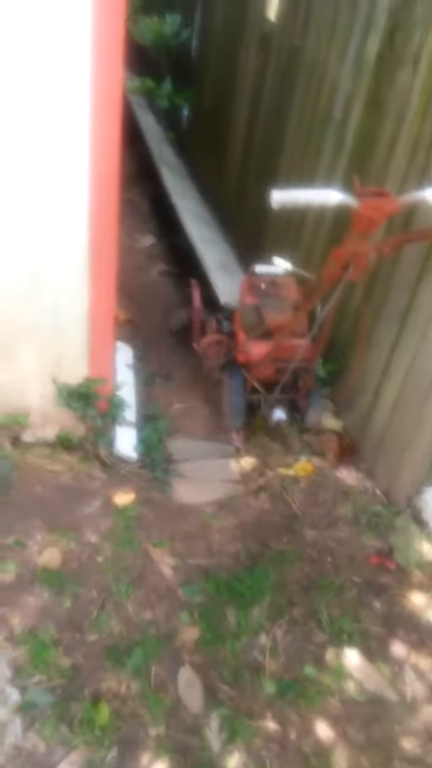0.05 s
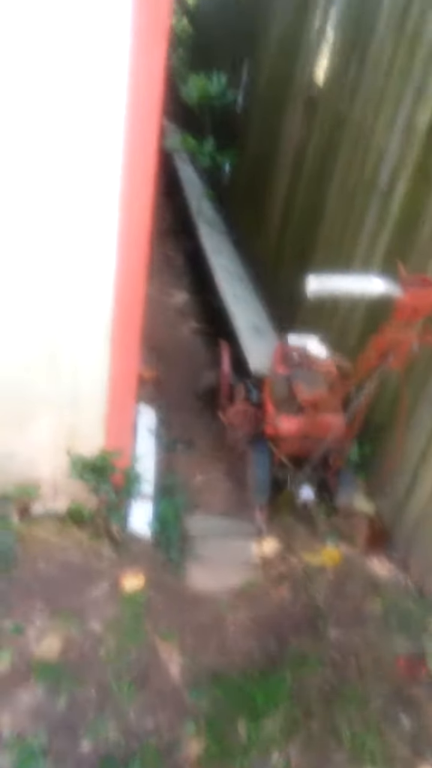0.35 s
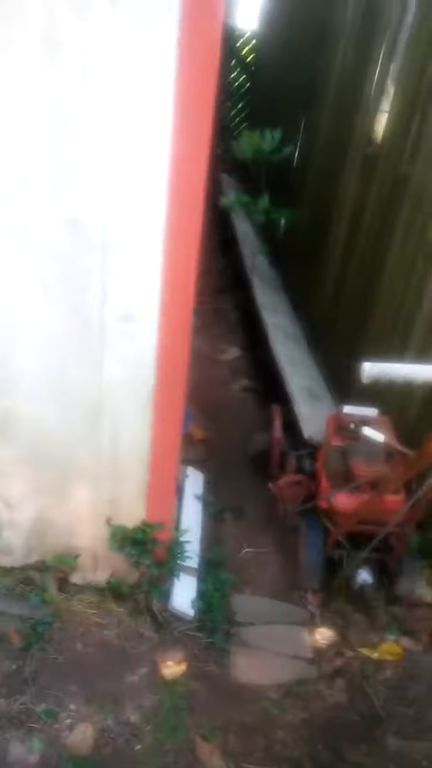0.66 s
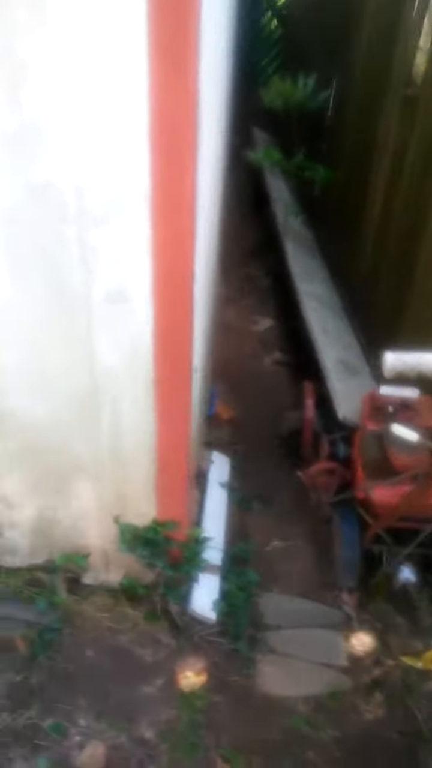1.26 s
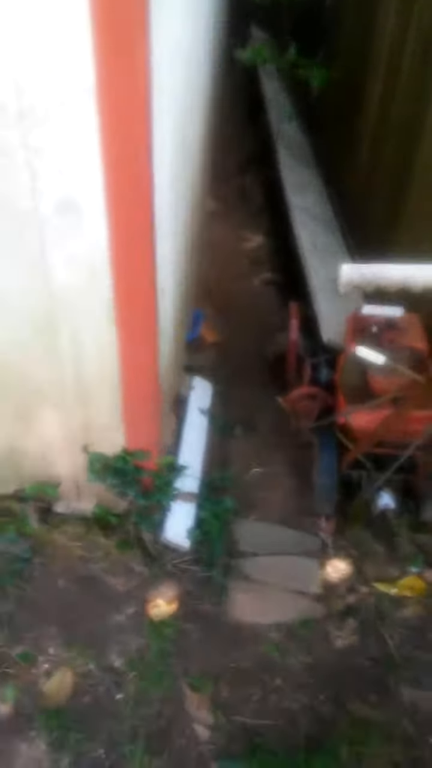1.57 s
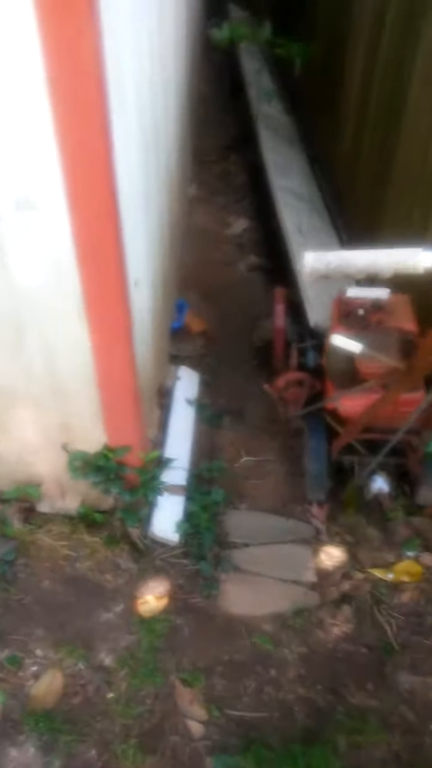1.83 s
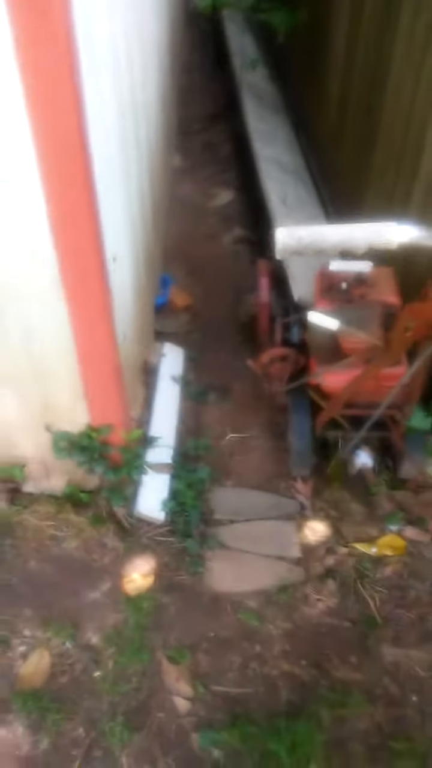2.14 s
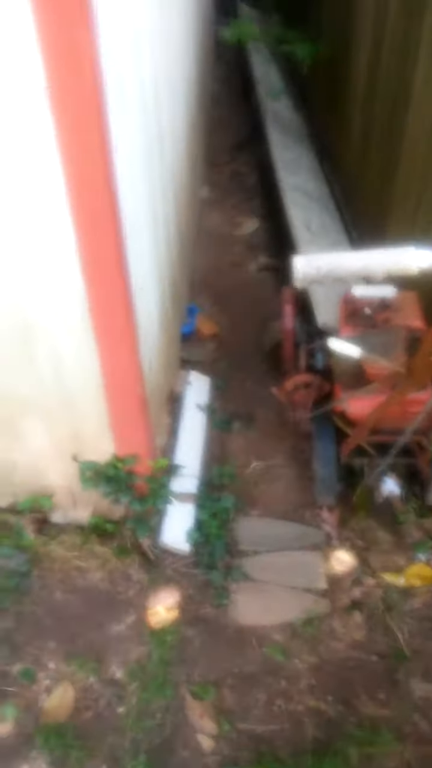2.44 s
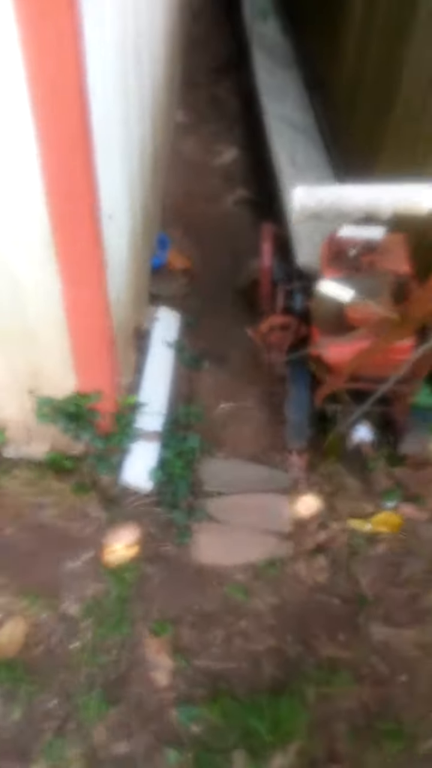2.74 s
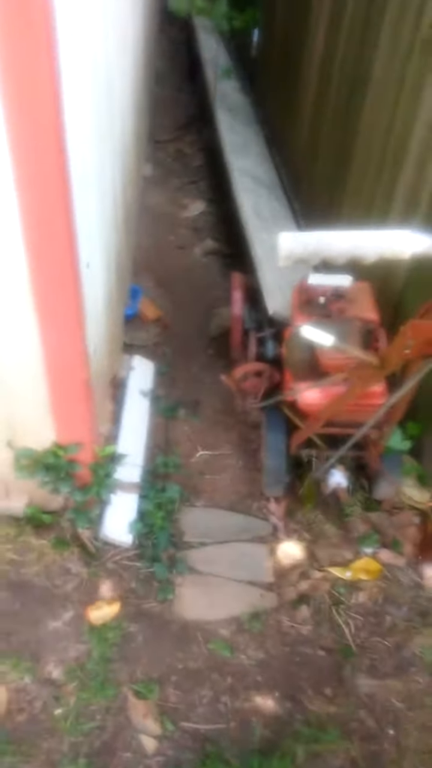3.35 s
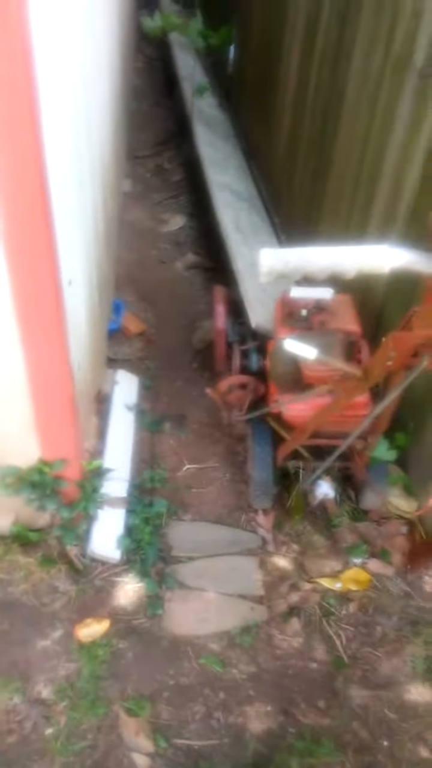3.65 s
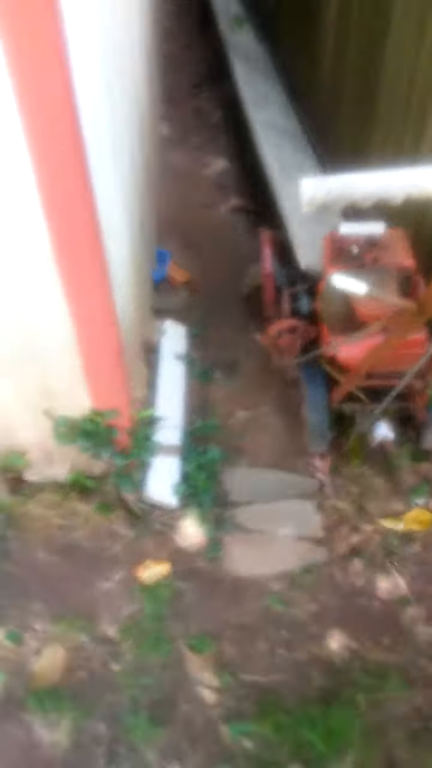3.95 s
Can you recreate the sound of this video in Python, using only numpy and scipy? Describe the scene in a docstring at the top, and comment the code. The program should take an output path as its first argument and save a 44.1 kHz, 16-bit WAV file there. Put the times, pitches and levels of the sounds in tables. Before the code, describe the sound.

Leaves rustle in a yard under a steady high hiss, with a faint roar and low drone far away. Dry leaves tick near 0.3 seconds and again from 1.3 to 1.6 seconds, when wind first thuds on the microphone. From about 2.3 to 3.5 seconds the wind buffets it in low, uneven thumps and rumble, strongest around 2.8 seconds, with another bump near the end.

```python
"""Leaves rustle in a yard under a high sizzling hiss near 5 kHz, coloured by the resonance of a
hand-held camera's microphone. A few dry leaves tick. A dull draught crosses the microphone port; from
just over a second in, eddies strike it in low thuds and slaps, the thuds brighter the harder they hit.
Far behind lies an outdoor roar with a low drone and a faint whine."""
import sys
import numpy as np
from scipy import signal
from scipy.fft import rfft, irfft, next_fast_len
from scipy.io import wavfile
from scipy.ndimage import uniform_filter1d, map_coordinates

SR = 44100
rng = np.random.default_rng(int(sys.argv[2]) if len(sys.argv) > 2 else 0)


def pcm_store(signal):
    """Save signal as 16-bit PCM."""
    levels = np.round(np.clip(np.atleast_2d(signal), -1, 1) * 32767)
    wavfile.write(sys.argv[1], SR, levels.astype(np.int16).T)


N = 176400
TIME = np.arange(N) / SR


def amp(db):
    """Decibels to gain."""
    return 10 ** (np.asarray(db) / 20)


def unit(x):
    """Scale to rms 1."""
    return x / np.sqrt(np.mean(x ** 2) + 1e-20)


def curves(rows):
    """One value per sample for each column after the time."""
    times, *columns = np.transpose(rows)
    return [np.interp(TIME, times, column) for column in columns]


def wobble(knots_per_s):
    """A smooth random curve, swinging by about 1."""
    return map_coordinates(rng.standard_normal(1024), [TIME * knots_per_s], mode="wrap")


def gain_curve(spectrum):
    """Gain as a function of frequency, through (Hz, dB) points on a log axis."""
    points_hz, db = np.transpose(spectrum)
    return lambda hz: amp(np.interp(np.log(hz + 1), np.log(points_hz + 1), db))


def filtered(x, response):
    """x with each frequency scaled by response(hz)."""
    size = next_fast_len(N + SR // 2)
    return irfft(rfft(x, size) * response(np.fft.rfftfreq(size, 1 / SR)), size)[:N]


def coloured(x, spectrum):
    """x shaped by a spectrum, at rms 1."""
    return unit(filtered(x, gain_curve(spectrum)))


def resonance(centre_hz, half_width_hz):
    """Noise in one resonant band, at rms 1."""
    noise = rng.standard_normal(N)
    return unit(filtered(noise, lambda hz: 1 / (1 + ((hz - centre_hz) / half_width_hz) ** 2)))


def patchy_noise(patchy_db):
    """White noise with patches of random gain in time and frequency."""
    bins = signal.stft(rng.standard_normal(N), nperseg=512)[2]
    patches = uniform_filter1d(rng.standard_normal(bins.shape), size=7, axis=0)
    patches = unit(uniform_filter1d(patches, size=14, axis=1))
    return unit(signal.istft(bins * amp(patchy_db * patches), nperseg=512)[1][:N])


def grains(per_s=500, scatter_db=0.5, t60_s=0.012):
    """Dense, short bursts of noise, as when leaves brush each other."""
    onsets = rng.random(N) < per_s / SR
    hits = onsets * amp(scatter_db * np.clip(rng.standard_normal(N), -2, 2))
    decay = amp(-60 * TIME[:SR // 8] / t60_s)
    power = signal.fftconvolve(hits ** 2, decay ** 2)[:N]
    return unit(np.sqrt(np.abs(power)) * rng.standard_normal(N))


def grainy_noise(spectrum, patchy_db, grain_share=0.32):
    """Grains over a smooth wash, shaped by a spectrum."""
    bursts = np.sqrt(grain_share) * grains()
    wash = np.sqrt(1 - grain_share) * patchy_noise(patchy_db)
    return coloured(bursts + wash, spectrum)


def foliage():
    """Near leaves brush together over the wash of far ones: a mid-range rustle with a fine fizz."""
    # Rustle and fizz. Each row: time in seconds, level in dB.
    rustle_levels = [(0.05, -52), (0.27, -47.5), (0.28, -46), (0.33, -48), (1.1, -46), (2.61, -44.5),
                     (2.73, -45), (3.81, -46), (3.95, -48)]
    fizz_levels = [(0, -71), (.3, -69), (1.2, -63), (2.2, -61.5), (2.9, -57), (3.4, -59), (4, -59.5)]
    # Their spectra. Each row: frequency in Hz, relative density in dB.
    rustle_colour = [(200, -35), (700, -3), (1170, -4), (1500, -1.5), (2000, -0.5), (2600, 0), (3300, -2.5),
                     (4500, -7.5), (5600, -8), (6600, -20), (12000, -50)]
    fizz_colour = [(3000, -17), (5500, 6), (6300, 9.5), (7000, 1.5), (8200, -1.5), (9500, -7.5),
                   (11000, -17.5), (15500, -28)]
    rustle_db, = curves(rustle_levels)
    fizz_db, = curves(fizz_levels)
    rustle = amp(rustle_db - 0.5) * grainy_noise(rustle_colour, patchy_db=1.25)
    fizz = amp(fizz_db) * grainy_noise(fizz_colour, patchy_db=1.3)
    return rustle + fizz


def microphone_sizzle(surge_half_s=0.029):
    """A high hiss near 5 kHz, coloured by the microphone's resonance; it brightens in the breeze."""
    # Each row: time in seconds, level in dB, share of the brighter sizzle from 0 to 1.
    sizzle_levels = [(0, -45.5, 0.07), (.5, -44.5, 0.03), (.8, -43, 0), (1.15, -43, 0.1), (1.45, -42, 0.35),
                     (1.8, -44.5, 0.63), (2.2, -44.5, 0.56), (2.6, -42.5, .65), (2.9, -42, 0.6),
                     (3.35, -42, 0.6), (3.55, -45.5, 0.6), (3.68, -43, 0.9), (4, -46, 0.74)]
    # Brief surges. Each row: centre in seconds, boost in dB.
    surges = [(.265, 3), (.375, 3), (.49, 2.5), (1.04, 3)]
    # The resonance, soft and bright. Each row: frequency in Hz, relative density in dB.
    soft_resonance = [(1500, -27), (3200, -12), (3800, -8), (4300, -2), (4750, -0.5), (5150, -2.5),
                      (5600, -9), (6100, -18), (6700, -27), (9000, -32.5), (15000, -54)]
    bright_resonance = [(1500, -28), (3200, -15.5), (3800, -3.5), (4400, -3.5), (5100, -1), (5650, -5),
                        (6150, -14), (6800, -26), (9000, -42), (15000, -61.5)]
    sizzle_db, bright_share = curves(sizzle_levels)
    surge_db = sum(db * np.exp(-((TIME - centre) / surge_half_s) ** 2) for centre, db in surges)
    soft = np.sqrt(1 - bright_share) * grainy_noise(soft_resonance, patchy_db=2.2)
    bright = np.sqrt(bright_share) * grainy_noise(bright_resonance, patchy_db=0.4)
    return amp(sizzle_db + surge_db) * (soft + bright)


def distant_roar(roar_db=-42.5, drone_hz=84.9, drone_db=-44, wander_rad=0.68):
    """Far beyond the yard, a roar with a wavering low drone and a faint, blurred whine."""
    # Spectrum of the roar. Each row: frequency in Hz, relative density in dB.
    roar_colour = [(20, -31.5), (35, -20), (60, -1), (130, -1), (180, 1.5), (280, 1), (360, -2),
                   (500, -1.5), (610, -3), (750, -4.5), (950, -4.5), (1180, -12), (1500, -11),
                   (2200, -20.5), (7000, -55)]
    # The far whine. Each row: time in seconds, level in dB.
    whine_levels = [(0, -54), (1.1, -52.5), (1.6, -69), (2.7, -57.5), (4, -66)]
    whine_db, = curves(whine_levels)
    waver = amp(2.9 * wobble(14))
    drone = unit(waver * np.sin(2 * np.pi * drone_hz * TIME + wander_rad * wobble(9)))
    roar = coloured(patchy_noise(patchy_db=1.54), roar_colour)
    whine = resonance(centre_hz=747, half_width_hz=45)
    return amp(roar_db) * roar + amp(drone_db) * drone + amp(whine_db) * whine


def turbulence(spectrum):
    """Low pressure swings of fairly even strength."""
    swings = coloured(rng.standard_normal(N), spectrum)
    power = uniform_filter1d(np.abs(signal.hilbert(swings)) ** 2, size=1100)
    return unit(swings / np.sqrt(np.abs(power) + 0.1))


def draught():
    """Light air flows over the microphone port in a dull, unsteady rumble."""
    # Air flow outside the port. Each row: time in seconds, level in dB.
    flow_levels = [(0, -43), (1, -41), (1.1, -36.5), (1.35, -36), (1.6, -37.5), (1.95, -34.5), (2.2, -38),
                   (2.7, -29.5), (3.45, -28.5), (3.65, -39), (4, -33)]
    # Its spectrum, duller than the eddies. Each row: frequency in Hz, relative density in dB.
    flow_colour = [(15, -19), (30, -12), (48, 0), (75, 2), (100, -7.5), (130, -17.5), (220, -32),
                   (500, -70)]
    flow_db, = curves(flow_levels)
    return amp(flow_db + 1.7 * wobble(22)) * turbulence(flow_colour)


def leaf_ticks(attack_s=0.0003, crack_db=-7):
    """Dry leaves snap close by: a broad crack and a brief ring at each leaf's own pitch."""
    # Each row: start in seconds, gain in dB, pitch in Hz, relative ring in dB, seconds to fall 60 dB.
    ticks = [(0.264, -31, 4700, -6, 0.022), (.2828, -35, 3100, -1, 0.037), (.761, -43.5, 1900, 3.5, 0.08),
             (1.301, -27.5, 4600, -9, 0.041), (1.4166, -29, 4500, -2, .018),
             (1.442, -24.5, 4700, -13, 0.019), (1.573, -23.5, 4700, -8, 0.019)]
    # Spectrum of the crack. Each row: frequency in Hz, relative density in dB.
    crack_colour = [(500, -25), (1200, -34), (1700, 6), (2300, -6), (3300, -4.5), (4600, 2.5), (5500, -9),
                    (6800, -21), (8500, -28), (12000, -42)]
    crack = amp(crack_db) * coloured(rng.standard_normal(N), crack_colour)
    out = np.zeros(N)
    for start, db, pitch_hz, ring_db, t60_s in ticks:
        age = np.maximum(TIME - start, 0)
        envelope = amp(db - 60 * age / t60_s) * (1 - np.exp(-age / attack_s))
        ring = amp(ring_db) * resonance(pitch_hz, half_width_hz=610)
        out += envelope * (crack + ring)
    return out


def eddy_thuds(attack_s=0.0048, release_s=0.01, thud_db=-2.5):
    """Each eddy swells on the port, holds and lets go; hard ones add a higher flutter."""
    # Eddies at the port. Each row: start in seconds, hold in seconds, strength in dB.
    eddies = [(1.287, 0.025, -28), (1.354, 0.025, -22.5), (1.396, 0.022, -14.5), (1.439, 0.016, -10),
              (1.503, 0.037, -20.5), (2.254, 0.016, -19), (2.277, 0.11, -22.5), (2.493, 0.055, -18.5),
              (2.606, 0.024, -17.5), (2.66, .03, -8), (2.707, 0.068, -16), (2.807, 0.046, -10),
              (2.865, 0.014, -16.5), (2.921, 0.0069, -15), (2.954, 0.044, -11), (3.044, 0.014, -19.5),
              (3.096, 0.024, -13), (3.189, 0.031, -26.5), (3.242, 0.041, -18), (3.291, 0.032, -19.5),
              (3.38, 0.11, -24), (3.901, 0.032, -20), (3.998, .03, -17)]
    # Spectra of thud and flutter. Each row: frequency in Hz, relative density in dB.
    thud_colour = [(15, -34), (30, -17.5), (50, 2), (75, 0.5), (100, -6), (135, -13), (200, -22.5),
                   (300, -55), (600, -89)]
    flutter_colour = [(60, -23), (120, 4), (220, 2.5), (300, -18.5), (420, -15.5), (600, -29.5),
                      (1200, -60), (3000, -79)]
    power = np.zeros(N)
    for start, hold_s, db in eddies:
        rise = np.exp(np.minimum(TIME - start, 0) / attack_s)
        fall = np.exp(-np.maximum(TIME - start - hold_s, 0) / release_s)
        power += (amp(db) * rise * fall) ** 2
    strength = np.sqrt(power + 1e-12)
    thud = amp(thud_db) * strength * turbulence(thud_colour)
    hardness = strength / amp(-13.5)  # 1 at a hard hit
    flutter_gain = amp(-29 + 1.77 * wobble(70)) * hardness ** 1.52  # grows faster than the thud
    return thud + flutter_gain * turbulence(flutter_colour)


def air_slaps(half_width_cycles=0.63):
    """A breaking eddy gives one quick push and pull on the port."""
    # Each row: centre in seconds, gain in dB, pitch in Hz.
    slaps = [(1.442, -17.5, 141), (2.254, -25.5, 183), (2.367, -37, 150), (2.498, -22.5, 194),
             (2.678, -18, 310), (2.692, -20, 215), (2.759, -15.5, 207), (2.792, -14, 225),
             (2.832, -9.5, 233), (2.869, -26, 212), (3.045, -24, 210), (3.099, -20.5, 242),
             (3.488, -24.5, 185)]
    out = np.zeros(N)
    for centre, db, hz in slaps:
        cycles = (TIME - centre) * hz
        out += amp(db) * np.exp(-(cycles / half_width_cycles) ** 2) * np.sin(2 * np.pi * cycles)
    return out


def scene():
    """One microphone in the yard: wind right on it, leaves around it, the roar far off."""
    # The wind's path through the port. Each row: frequency in Hz, gain in dB.
    port = [(12, -23), (25, -10), (45, 1), (500, -1), (1000, -7), (2500, -66)]
    wind = filtered(draught() + eddy_thuds() + air_slaps(), gain_curve(port))
    return (foliage() + microphone_sizzle() + distant_roar() + wind + leaf_ticks())[None]


def record(dry):
    """The camera adds faint noise of its own and keeps nothing above its band limit."""
    noise_db, top_hz = -68.5, 15720
    noisy = dry[0] + amp(noise_db) * rng.standard_normal(N)
    return filtered(noisy, lambda hz: hz < top_hz)[None]


dry = scene()
out = record(dry)
pcm_store(out)
```